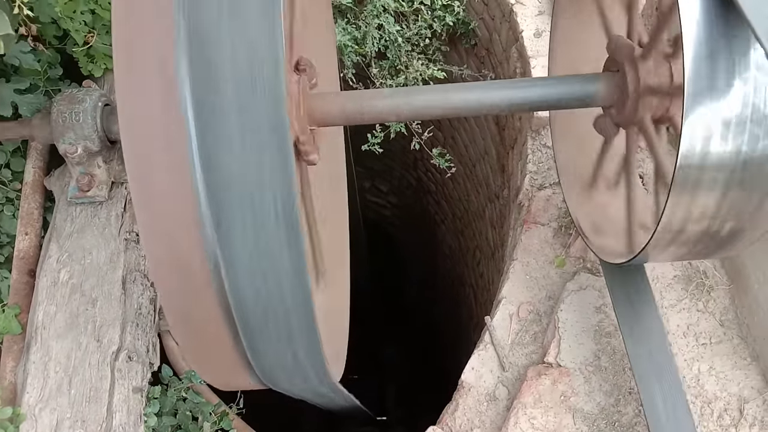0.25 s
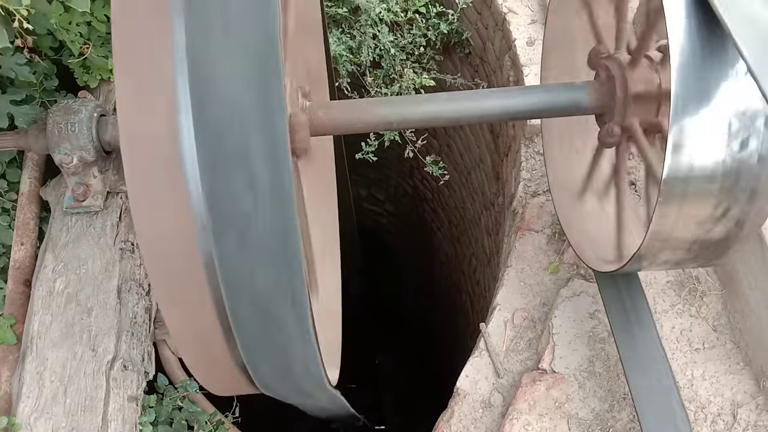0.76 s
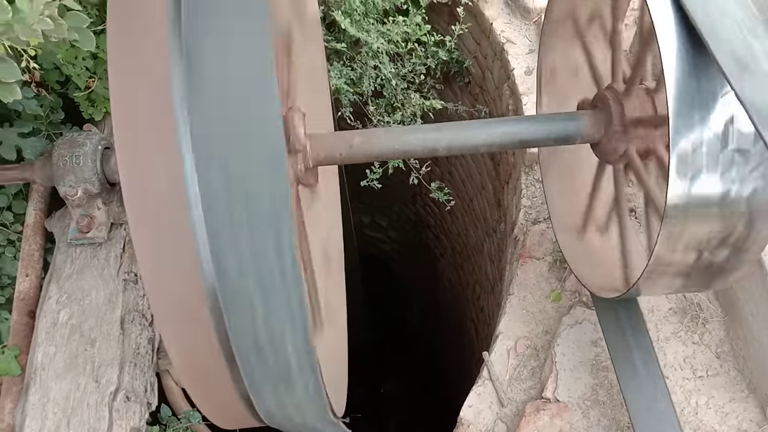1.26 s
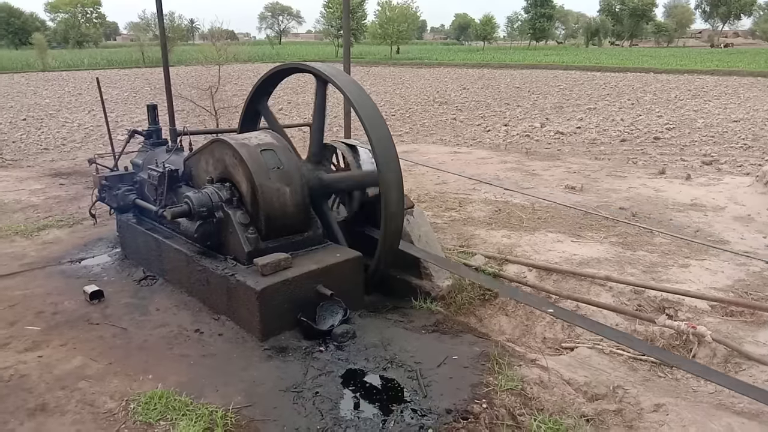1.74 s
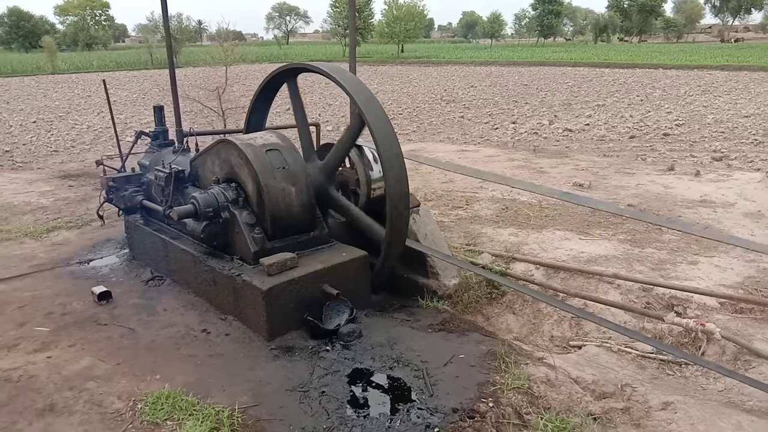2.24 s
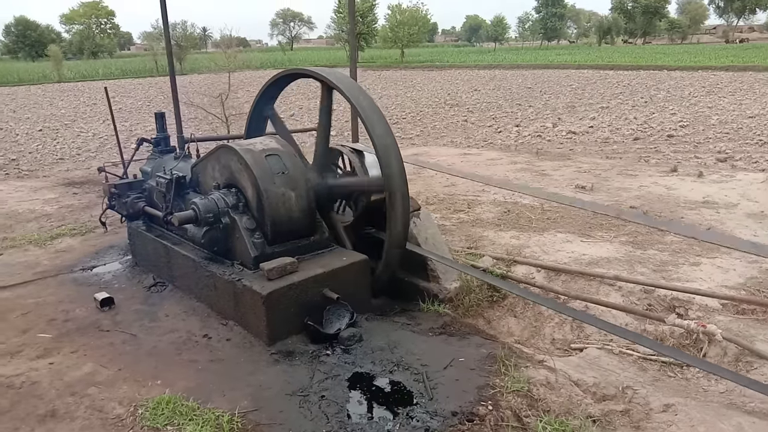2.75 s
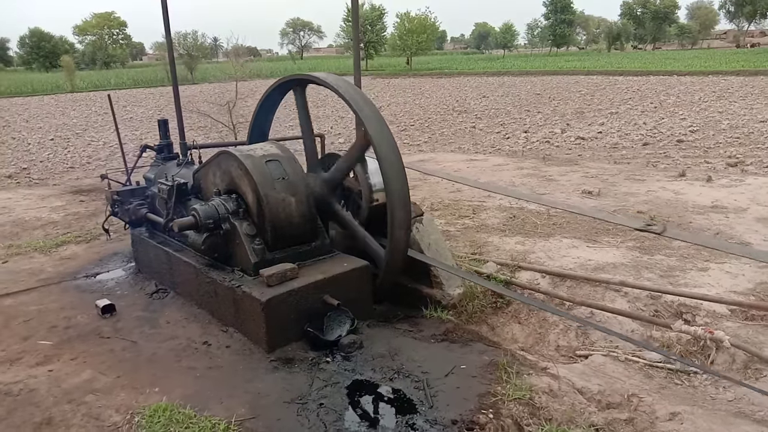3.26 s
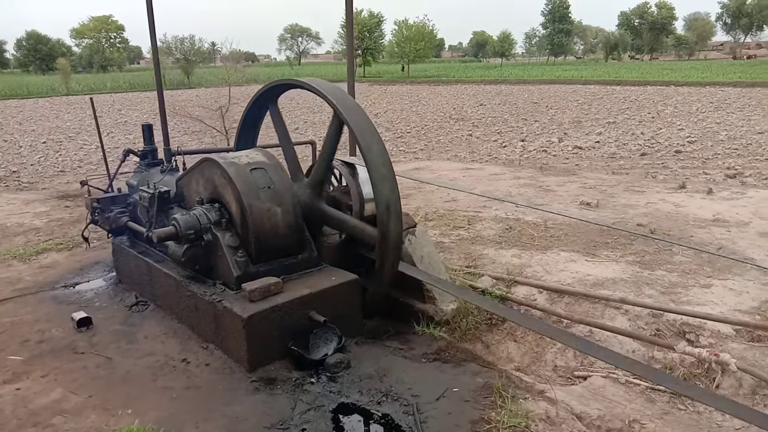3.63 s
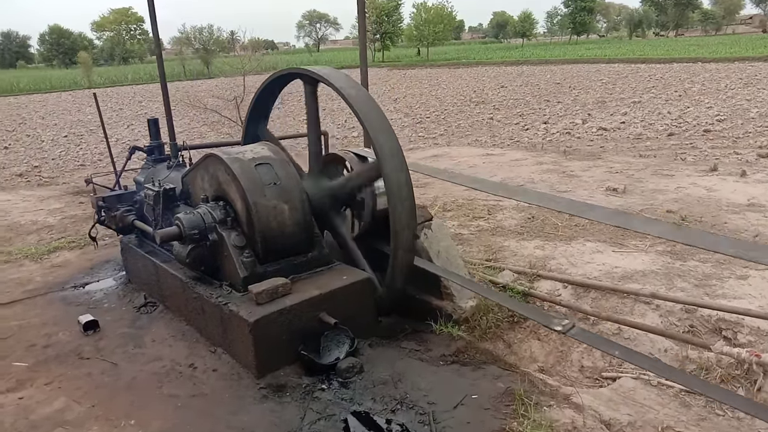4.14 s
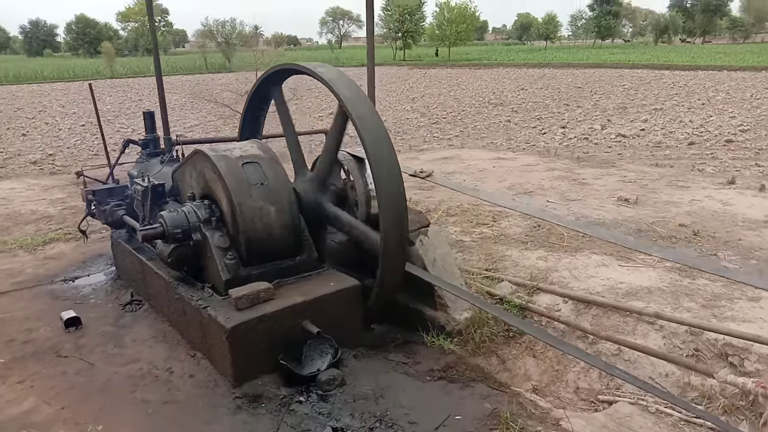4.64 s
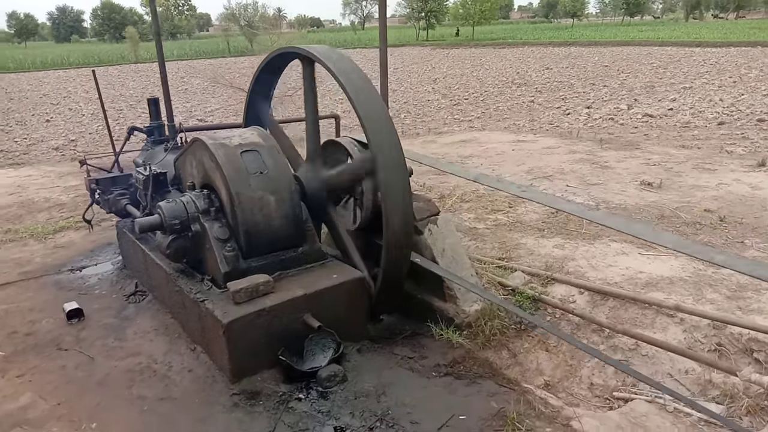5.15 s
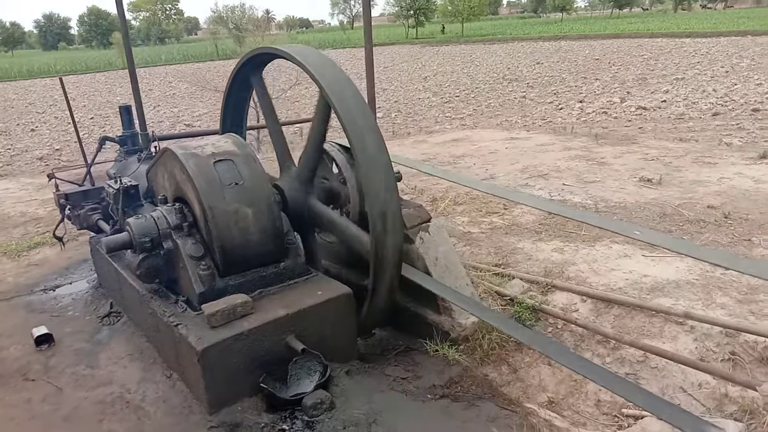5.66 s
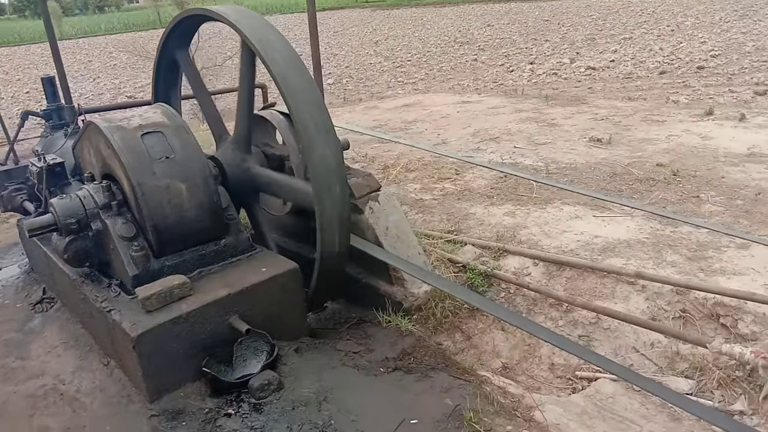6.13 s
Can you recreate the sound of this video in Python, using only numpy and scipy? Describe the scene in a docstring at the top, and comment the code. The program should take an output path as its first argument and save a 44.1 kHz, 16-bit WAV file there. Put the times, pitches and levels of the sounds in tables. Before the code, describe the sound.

First, close pulleys: rushing whirr, rough rumble, irregular sharp metal cracks and thin squeaks. A tiny gap of complete silence follows. Next the slow diesel engine takes over abruptly, each cycle a sharp clattering chuff, a low hollow note gliding upward, soft thuds and small ticks. Belt fasteners snap now and then over whining gears and light wind buffeting. Open air, no echo, small handheld microphone that compresses the strokes.

```python
"""First sharp clacks and the whirr of pump pulleys over a well; after a short silence one stands by the engine.
An old single-cylinder diesel drives a flat belt to the pump, in an open field; belt fasteners clack on pulleys.
Each four-stroke cycle brings a chuff of gas (shaped noise), a rising pipe note (gliding sines),
valve-gear ticks (short noise bursts) and low thuds and puffs (ringing sines).
Gear whine, rumble and gusts of wind lie beneath."""
import sys
import numpy as np
from scipy import signal
from scipy.fft import rfft, irfft
from scipy.io import wavfile
from scipy.ndimage import uniform_filter1d

SR = 44100
rng = np.random.default_rng(int(sys.argv[2]) if len(sys.argv) > 2 else 0)


def to_linear_factor(level_db):
    """Convert decibel levels (scalar or array-like) to linear amplitude factors."""
    exponent = np.asarray(level_db, float) / 20
    return 10 ** exponent


def master(y):
    """Save y as 16-bit WAV."""
    cut = np.clip(np.atleast_2d(y).T, -1, 1)
    pcm = np.round(cut * 32767)  # scale
    wavfile.write(sys.argv[1], SR, pcm.astype(np.int16))


N = 281799

# "level/dB" is a nominal level: the functions add random spread, and often the strength of the cycle.
# Four-stroke cycles: start t/s, gas and valve-gear level/dB, pipe-note level/dB
CYCLE_STARTS = [(-.385, -11, 0), (0.192, -8, 2), (0.769, -12, 0), (1.172, 0.5, -6), (1.748, 2.5, -2),
                (2.328, 2, -3.5), (2.905, 1.5, 1), (3.483, 1.5, -3), (4.061, 1.5, -3.5), (4.637, 1.5, -4),
                (5.214, 2, -3.5), (5.792, 2.5, -1.5), (6.370, 3.5, 0)]
# Gas hiss through a cycle: t/s in cycle, level/dB, lows and highs relative to the middle band, level/dB each
GAS_THROUGH_CYCLE = [(0, -35, 12, 14.5), (.018, -39.5, 6, 0.5), (.029, -19, -6.5, 11.5),
                     (.037, -25.5, 5.5, 14), (.046, -16.5, -12, 3), (.057, -13.5, -14, 6),
                     (.066, -26.5, -2, 3.5), (.12, -31, 2, 4.5), (.3, -44, 5.5, 4.5), (.42, -39, -3, 3),
                     (.445, -33.5, -3, 11), (.52, -41.5, -1.5, 0.5), (.577, -42, .5, 3)]
# Valve-gear ticks: t/s in cycle, level/dB, centre f/Hz, t60/s (time to fall by 60 dB), rise/s
VALVE_TICKS = [(-.001, -13, 3500, 0.015, .0027), (0.015, -24.5, 5450, 0.028, 0.0026),
               (.024, -22.5, 6394, 0.044, .002), (.083, -35.5, 4540, .11, 0.0024),
               (0.227, -26, 5470, 0.097, .002), (.302, -37, 4998, .015, .0007),
               (.425, -29.5, 6470, 0.029, .0009), (.53, -33.5, 5500, 0.057, 0.0036)]
# Pipe note as the piston sweeps: t/s in cycle, f/Hz, level/dB
PIPE_NOTE = [(0.086, 143.2, -68), (0.101, 150.5, -36.5), (.15, 176.7, -35.5), (0.199, 192.5, -40),
             (.26, 219.6, -39), (.3, 225, -39.5), (0.359, 227.4, -64), (.4, 233.5, -76)]
# Lower note below it: t/s in cycle, f/Hz, level/dB
PIPE_UNDERTONE = [(.17, 70.24, -66), (.2, 79.44, -37.5), (0.269, 105.1, -41.5), (.33, 130, -42.5),
                  (0.368, 140, -131)]
# Low thuds and booming puffs of the pipe in each cycle: t/s in cycle, level/dB, f/Hz, t60/s
CYCLE_THUDS = [(0.015, -17, 126, 0.071), (.022, -20, 296, 0.085), (.022, -18, 657, 0.15),
               (0.116, -23, 228, .15), (.185, -25, 221.5, .27), (.228, -22.5, 189, .04),
               (.27, -20.5, 219.8, 0.16), (0.431, -21, 224.3, 0.25), (.43, -31, 348.6, .24),
               (.43, -28, 685, .2), (.495, -30, 256.5, .15)]
# Clacks of belt fasteners on pulleys, with some strong valve ticks: t/s, level/dB, strongest f/Hz,
# lows and highs relative to the middle band, level/dB each
CLACK_EVENTS = [(.0004, -8, 3000, -2.5, -5), (.192, -5, 3480, -13, -3), (0.22, -19, 7340, 6, 13),
                (.3115, -14, 6440, -2, 1), (0.446, -12, 3180, -6, 5), (.515, -20.5, 6200, 1, 7),
                (.649, -17.5, 6070, -8, 2), (0.7813, -3, 5830, -6, 15.5), (0.793, -2.5, 3980, -0.5, 3),
                (.9306, -19.5, 5900, 1, 8), (1.07, -19, 3240, 4, 9), (1.1594, -25, 3160, 4, 10),
                (1.25, -18, 6140, -.5, -5), (1.4154, -19.5, 6260, 3.5, 3), (1.9773, -7.5, 5500, 2, 2),
                (2.768, -21, 5810, -1, -8), (2.797, -4, 7500, -2, 6), (3.3794, -9, 5360, 4, 0),
                (3.5954, -9, 5940, 1, -19), (4.4063, -6.5, 7300, -3.5, 8), (4.7713, -6, 5170, 0, 4),
                (4.8504, -24.5, 5570, 2, -8), (4.8678, -22, 5700, -13, -16), (5.2078, -5, 4900, -3.5, 11),
                (5.443, -19, 5760, -9, -27), (5.658, -24, 5550, -12, 4), (6.022, -5, 7950, -2.5, 2),
                (6.1685, -7, 4820, 1, 3)]
# Ringing of the pulley rim: f/Hz, relative level/dB, t60/s
RIM_MODES = [(1546, -12.5, 0.34), (1750, -10.5, 0.39), (1976, -11, 0.35), (2147, -8, 0.35),
             (2700, -14, 0.41), (3010, -5, 0.14), (3500, 3.5, 0.096), (5500, -16, .14), (6130, 0.5, 0.18),
             (7140, 5, 0.059), (7100, 3, 0.053), (7680, -20, 0.021)]
# Colour of hiss, ticks, clacks and slaps: f/Hz, relative level/dB per Hz
BRIGHT_COLOUR = [(880, -7), (1500, -3), (1670, -6), (2100, -1.5), (2440, -2), (3840, -0.5), (4200, -2.5),
                 (5490, 1.5), (6630, -2.5), (7240, 1), (8240, -7.5), (9750, -17.5), (13500, -29),
                 (14900, -12), (16000, -25)]
# Slow changes as the listener moves and the wind gusts: t/s, gear, rumble and wind level/dB each
RUNNING_LEVELS = [(0, -36, -33, -54), (.15, -26, -29.5, -42), (.45, -33, -33, -38.5), (.75, -26, -29, -33),
                  (1.0, -31, -33.5, -35.5), (1.26, -30, -29, -56), (1.41, -34, -35.5, -46),
                  (2.2, -35, -37.5, -48.5), (3.0, -35.5, -38, -51), (3.55, -34.5, -38, -38),
                  (3.95, -32, -38.5, -56), (4.45, -31.5, -36, -40), (4.75, -31.5, -38.5, -55),
                  (5.2, -30, -35, -42), (5.6, -30, -36.5, -34), (6.05, -33, -36.5, -36),
                  (6.39, -30.5, -35.5, -50)]
# Iron resonances set off by the gears: f/Hz, nominal width/Hz, relative level/dB
GEAR_MODES = [(1246, 127, -0.5), (575.3, 26, -8.5), (785, 26, -12)]
# Colour of the rumble: f/Hz, relative level/dB per Hz
RUMBLE_COLOUR = [(24, -42), (40, -23), (151, -5.5), (227, 1), (422, 0.5), (567, 4), (1130, -0.5),
                 (1240, -8), (1440, -10), (2000, -11), (2600, -34), (4400, -120)]
# Colour of the pulley whirr: f/Hz, relative level/dB per Hz
WHIRR_COLOUR = [(880, -31), (1500, -5), (1920, -6.5), (2190, 4), (2370, 2), (3450, 8), (3810, 2.5),
                (4550, -8.5), (6000, 7.5), (6690, -7.5), (7460, -1.5), (10600, -25.5), (13500, -31),
                (14900, -16), (16000, -28)]
# Loudness of the whirr: t/s, level/dB
WHIRR_LEVELS = [(0, -35), (.16, -26.5), (.37, -26.5), (.7, -27.5), (.9, -26.5), (1.05, -28.5),
                (1.12, -25.5), (1.19, -27.5), (1.27, -28)]
# Short pulley squeaks: start t/s, end t/s, f/Hz, level/dB
PULLEY_SQUEAKS = [(.865, 1.0, 4100, -34), (1.06, 1.16, 3240, -30), (.32, .39, 500, -34)]
# Resonances of the engine body: f/Hz, width/Hz, relative level/dB
CASTING_MODES = [(2230, 340, -2), (3360, 310, -10.5), (5550, 480, -6.5), (5970, 200, 2), (7360, 78, 1)]
# Chirps of small steel parts, and rings of the engine casting near 2.1 kHz: t/s in cycle, f/Hz, width/Hz,
# level/dB, t60/s
CYCLE_CHIRPS = [(.273, 5390, 130, -25, .14), (.273, 10700, 70, -37, .06), (.274, 12800, 50, -38, .07),
                (.135, 11600, 120, -42, .07), (.135, 12800, 120, -44, .07), (.426, 12700, 120, -44, .15),
                (.045, 2140, 70, -31, .08), (.108, 2120, 90, -32, .13), (.19, 1400, 60, -36, .12),
                (.135, 15200, 700, -42, .1), (.445, 15200, 700, -42, .08)]
# Swell of gears and rumble under the power stroke: t/s in cycle, gear level/dB, rumble level/dB
LOAD_SWELL = [(0, 1.5, 5.5), (.07, -3.5, 1.5), (.14, 1, 5), (.2, 4.5, 4), (.3, -0.5, 2), (.4, -3.5, -2),
              (.45, -3, -1), (.577, -4.5, -1.5)]

SILENCE_START_S, SILENCE_END_S = 1.268, 1.399
FAR_CYCLES = 3   # cycles heard from beside the pulleys


def curve(rows, t):
    """Reads each column of a table at the times t, with straight lines between rows."""
    row_times, *columns = np.transpose(rows)
    return [np.interp(t, row_times, column) for column in columns]


def rms_one(x):
    """Scales a sound to unit power."""
    return x / np.sqrt(np.mean(x ** 2) + 1e-20)


def coloured(colour):
    """Returns the spectrum of unit-power noise with the given colour, and its frequency axis in Hz."""
    hz = np.arange(N // 2 + 1) * SR / N + 1
    colour_hz, colour_db = np.transpose(colour)
    gain = to_linear_factor(np.interp(np.log(hz), np.log(colour_hz), colour_db))
    noise = rfft(rng.standard_normal(N)) * gain
    return noise / np.sqrt(np.mean(irfft(noise, N) ** 2)), hz


def three_bands(colour):
    """Splits coloured noise near 4.3 and 9 kHz into three bands that add up to the whole."""
    noise, hz = coloured(colour)
    low = 1 / (1 + (hz / 4300) ** 8)
    high = 1 / (1 + (9000 / hz) ** 8)
    return [irfft(noise * share, N) for share in (low, 1 - low - high, high)]


def drift(rate_hz):
    """Smooths noise into a slow random wander with a spread of 1."""
    r = np.exp(-2 * np.pi * rate_hz / SR)
    wander = signal.lfilter([1], [1, -2 * r, r * r], rng.standard_normal(N + SR))
    return rms_one(wander[SR:])   # the first second lets the filter settle


def resonance(x, hz, width_hz):
    """Passes sound near one frequency, as a two-pole resonator with a gain of 1 at its top."""
    r = np.exp(-np.pi * width_hz / SR)
    edge = (1 - r * r) / 2
    return signal.lfilter([edge, 0, -edge], [1, -2 * r * np.cos(2 * np.pi * hz / SR), r * r], x)


def ring(clicks, hz, t60):
    """Lets each click set off a sine that dies away; a unit click starts it at height 1."""
    r = to_linear_factor(-60 / (t60 * SR))
    turn = 2 * np.pi * hz / SR
    return signal.lfilter([0, np.sin(turn)], [1, -2 * r * np.cos(turn), r * r], clicks + 1e-18)


def each_cycle(offset_s, db, spread_db):
    """Places one click of varying strength in each cycle; later cycles click only once the silence has begun."""
    starts, strength_db, _ = np.transpose(CYCLE_STARTS)
    at = np.round((starts + offset_s) * SR).astype(int)
    size = to_linear_factor(db + strength_db + spread_db * rng.standard_normal(len(starts)))
    far = np.arange(len(starts)) < FAR_CYCLES
    heard = (at >= 0) & (at < N) & (far | (at > SILENCE_START_S * SR))
    clicks = np.zeros(N)
    clicks[at[heard]] = size[heard]
    return clicks


def dying(clicks, t60, rise_s):
    """Makes a loudness curve that rises quickly at each click and dies away."""
    r = to_linear_factor(-60 / (t60 * SR))
    rise = np.exp(-1 / (rise_s * SR))
    decay = signal.lfilter([1], [1, -r], clicks + 1e-18)
    return signal.lfilter([1 - rise], [1, -rise], decay)


def wind(wind_db):
    """Wind buffets the microphone: low noise whose strength wanders."""
    band = signal.butter(2, [65, 130], "band", fs=SR, output="sos")
    lumps = signal.sosfilt(band, rng.standard_normal(N))
    return rms_one(lumps) * to_linear_factor(wind_db + 4.4 * drift(3.8))


def rumble(rumble_db):
    """Deep coloured noise of the running engine, unsteady in strength."""
    return irfft(coloured(RUMBLE_COLOUR)[0], N) * to_linear_factor(rumble_db + 2.0 * drift(25))


def gears(gear_db):
    """Meshing teeth give a wandering sine whine and keep iron resonances sounding with uneven noise."""
    rattle = rng.standard_normal(N) * to_linear_factor(3.74 * drift(46))
    iron = np.zeros(N)
    for hz, width_hz, db in GEAR_MODES:
        once = resonance(rattle, hz, 2.13 * width_hz)
        twice = resonance(once, hz, 2.13 * width_hz)   # a second pass steepens the slopes
        iron += to_linear_factor(db) * rms_one(twice)
    mesh_hz = 1238 + 14 * drift(10.06)
    phase = 2 * np.pi * np.cumsum(mesh_hz) / SR
    whine = np.sqrt(2) * to_linear_factor(-3.5 + 3.6 * drift(21.6)) * np.sin(phase)
    return to_linear_factor(gear_db) * (iron + whine)


def running(t, age):
    """Gears and rumble swell together under load, with the wind beside them."""
    gear_db, rumble_db, wind_db = curve(RUNNING_LEVELS, t)
    gear_load_db, rumble_load_db = curve(LOAD_SWELL, age)
    sway = drift(4.0)   # shared, so both rise and fall together
    gear_db = gear_db + gear_load_db + 1.5 * sway
    rumble_db = rumble_db + rumble_load_db + 1.2 * sway
    return gears(gear_db) + rumble(rumble_db) + wind(wind_db)


def pulleys(t):
    """Belt and bearings whirr close by as coloured noise, with narrow squeaks and small random belt slaps."""
    out = irfft(coloured(WHIRR_COLOUR)[0], N) * to_linear_factor(curve(WHIRR_LEVELS, t)[0] + 2.0 * drift(40))
    for start, end, hz, db in PULLEY_SQUEAKS:
        fade = np.clip(np.minimum(t - start, end - t) / 0.0058, 0, 1)
        out += to_linear_factor(db) * fade * rms_one(resonance(rng.standard_normal(N), hz, 19.4))
    slaps_per_s, slap_db = 14.0, -29
    slaps = (rng.random(N) < slaps_per_s / SR) * to_linear_factor(slap_db + 1.7 * rng.standard_normal(N))
    out += sum(three_bands(BRIGHT_COLOUR)) * dying(slaps, t60=0.067, rise_s=0.0036)
    return out * (t < SILENCE_START_S)


def clacks():
    """Belt-fastener clacks and some strong valve ticks: noise bursts plus a jangle, softer at the start when weak."""
    bands = three_bands(BRIGHT_COLOUR)
    out = np.zeros(N)
    hz, mode_db, mode_t60 = np.transpose(RIM_MODES)[:, :, None]
    # narrow noise instead of sines: rattling keeps the ringing rough
    jangle = np.array([rms_one(resonance(rng.standard_normal(N), f, 39.0)) for f in hz[:, 0]])
    for s, db, peak_hz, low_db, high_db in CLACK_EVENTS:
        i = round(s * SR)
        t = np.arange(min(N - i, SR // 3)) / SR
        rise_s = 0.00021 * to_linear_factor(-0.89 * db)
        rise = 1 - np.exp(-t / rise_s)
        t60 = 0.037 - 0.0069 * db   # weaker ones rattle on longer
        low, middle, high = (band[i:i + len(t)] for band in bands)
        burst = to_linear_factor(low_db) * low + middle + to_linear_factor(high_db) * high
        burst = 0.52 * burst + 1.29 * resonance(burst, peak_hz, 410)
        crack = to_linear_factor(-60 * t / t60) + to_linear_factor(-31.5 - 60 * t / 0.42)   # quick fall plus a faint longer tail
        chance_db = 2.5 * rng.standard_normal(hz.shape)
        strike_db = -19 + mode_db + 2.7 * low_db * (hz < 3000) + chance_db
        rim = np.sum(to_linear_factor(strike_db - 60 * t / mode_t60) * jangle[:, i:i + len(t)], axis=0)
        out[i:i + len(t)] += to_linear_factor(db) * rise * (crack * burst + rim)
    return out


def pipe(age, rows, rough_db):
    """A sine note glides up with the piston, wavering in strength and phase."""
    hz, db = curve(rows, age)
    phase = 2 * np.pi * np.cumsum(hz) / SR + 0.78 * drift(34)
    return np.sqrt(2) * to_linear_factor(db + rough_db * drift(29)) * np.sin(phase)


def pipe_notes(age, note_db, far):
    """Both pipe notes follow the cycle; beside the engine a resonance makes the pipe boom."""
    notes = pipe(age, PIPE_NOTE, rough_db=4.5) + pipe(age, PIPE_UNDERTONE, rough_db=3.0)
    notes = to_linear_factor(note_db) * notes
    boom = to_linear_factor(4.5) * resonance(notes, hz=237, width_hz=76)
    return notes + ~far * boom


def thuds_and_puffs():
    """Low thuds and booming puffs of the pipe in each cycle: soft pushes set dying sines ringing."""
    out = np.zeros(N)
    for s, db, hz, t60 in CYCLE_THUDS:
        push = dying(each_cycle(s, db, spread_db=2.0), 0.82 / hz, rise_s=0.056 / hz)
        out += ring(push * 6 * hz / SR, hz, t60)
    return out


def valve_gear():
    """Valve parts tick as short noise bursts, and small steel parts chirp and the casting rings as narrow
    noise, in each cycle."""
    bright = sum(three_bands(BRIGHT_COLOUR))
    out = np.zeros(N)
    for s, db, hz, t60, rise_s in VALVE_TICKS:
        colour = rms_one(resonance(bright, hz, 0.45 * hz) + 0.15 * bright)
        out += colour * dying(each_cycle(s, db, spread_db=4.5), t60, rise_s)
    for s, hz, width_hz, db, t60 in CYCLE_CHIRPS:
        whistle = rms_one(resonance(rng.standard_normal(N), hz, width_hz))
        out += whistle * dying(each_cycle(s, db, spread_db=2.5), t60, rise_s=0.0033)
    return out


def casting_clatter(low_db):
    """Loose parts tap the casting at random, about 500 times a second for each of its resonances."""
    clatter = np.zeros(N)
    for hz, width_hz, mode_db in CASTING_MODES:
        tap_size = to_linear_factor(1.5 * np.minimum(rng.exponential(1, N), 3))
        taps = (rng.random(N) < 500 / SR) * tap_size * rng.choice([-1, 1], N)
        share_db = mode_db + low_db * (hz < 4300)
        clatter += to_linear_factor(share_db) * rms_one(resonance(taps + 1e-18, hz, width_hz))
    return clatter


def gas(age, strength_db):
    """The chuff and its long blow-down: clumpy turbulent hiss that shakes loose parts against the casting."""
    db, low_db, high_db = curve(GAS_THROUGH_CYCLE, age)
    low, middle, high = three_bands(BRIGHT_COLOUR)
    clumps_db = 2.0 * drift(110)
    hiss = to_linear_factor(low_db + 2.0 * drift(33)) * low
    hiss += to_linear_factor(2.0 * drift(25)) * middle
    hiss += to_linear_factor(high_db) * high
    return to_linear_factor(db + strength_db + clumps_db) * (hiss + to_linear_factor(-12.5) * casting_clatter(low_db))


def scene():
    """Adds up all sources, dry in the open air."""
    t = np.arange(N) / SR
    starts, strength_db, note_db = np.transpose(CYCLE_STARTS)
    far = t < SILENCE_START_S
    current = np.searchsorted(starts, t, "right") - 1
    current[far] = np.minimum(current[far], FAR_CYCLES - 1)
    age = t - starts[current]   # seconds since the cycle began
    background = running(t, age) + pulleys(t)
    notes = pipe_notes(age, note_db[current], far)
    hits = clacks() + thuds_and_puffs() + valve_gear()
    return (background + notes + hits + gas(age, strength_db[current]))[None]


def limiter(x, top_db, share, release_db_s, ahead_s):
    """Makes a gain that falls just ahead of loud peaks of x and climbs back at a steady rate."""
    t = np.arange(N) / SR
    level_db = 10 * np.log10(uniform_filter1d(x ** 2, size=88) + 1e-12)
    over_db = np.maximum(share, 0) * np.maximum(level_db - top_db, 0)
    held_db = np.maximum.accumulate(over_db + release_db_s * t) - release_db_s * t
    ahead = round(ahead_s * SR)
    early_db = np.concatenate([held_db[ahead:], np.zeros(ahead)])
    held_db = np.maximum(held_db, early_db)
    return to_linear_factor(-uniform_filter1d(held_db, size=ahead))


def top_cut(x):
    """Nothing passes above the cut-off."""
    return signal.sosfilt(signal.butter(12, 16830, fs=SR, output="sos"), x)


def record(dry):
    """A small microphone and two limiters, with a short silence between the two listening positions."""
    t = np.arange(N) / SR
    weak_bass = signal.butter(2, 70, "high", fs=SR, output="sos")   # small microphone
    x = signal.sosfilt(weak_bass, dry[0])
    low, high = x, x
    for _ in range(2):   # two passes make a steep split at 1050 Hz
        low = signal.sosfilt(signal.butter(4, 1050, "low", fs=SR, output="sos"), low)
        high = signal.sosfilt(signal.butter(4, 1050, "high", fs=SR, output="sos"), high)
    # loud peaks above the split turn the part below it down
    x = high + low * limiter(high, top_db=-18.5, share=1.125, release_db_s=198, ahead_s=0.004)
    x = x * limiter(x, top_db=-16.5, share=0.58, release_db_s=116, ahead_s=0.0097)
    sounding = (t < SILENCE_START_S) | (t > SILENCE_END_S)
    x = np.clip(x * sounding, -1, 1)
    treble_end = signal.cheby2(14, 40, 15900, fs=SR, output="sos")   # 40 dB down from 15.9 kHz up
    x = signal.sosfilt(treble_end, x)
    return top_cut(x[None])


dry = scene()
out = record(dry)
master(out)
```